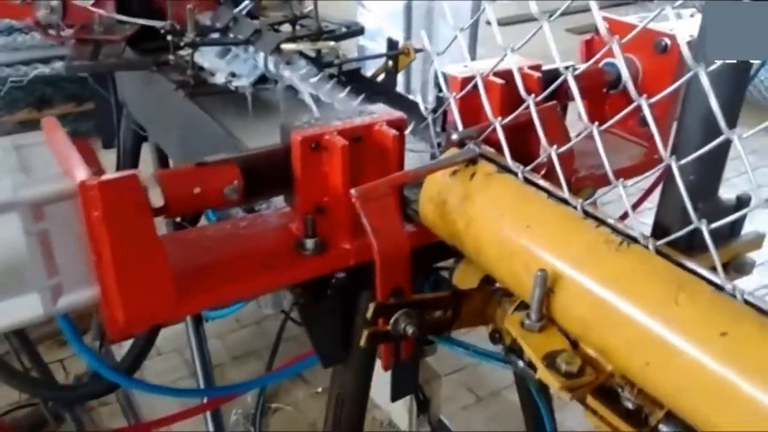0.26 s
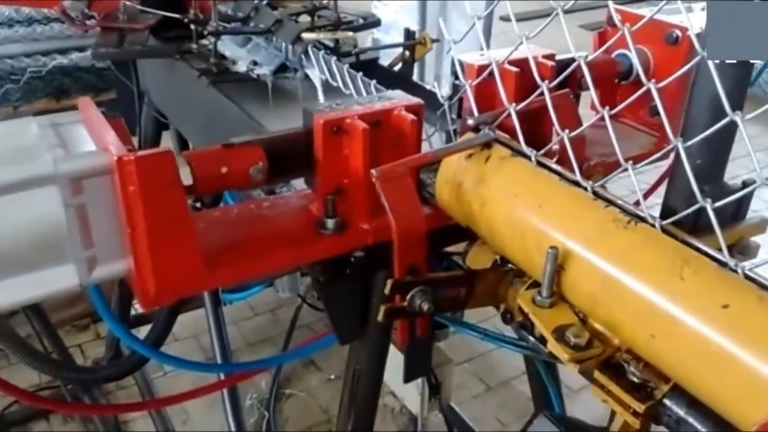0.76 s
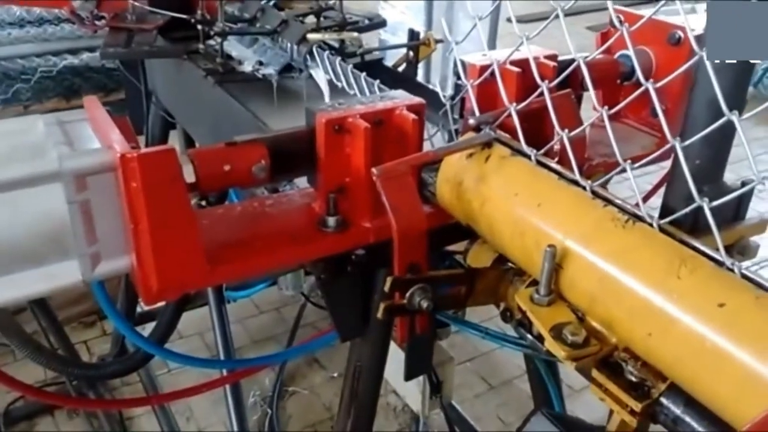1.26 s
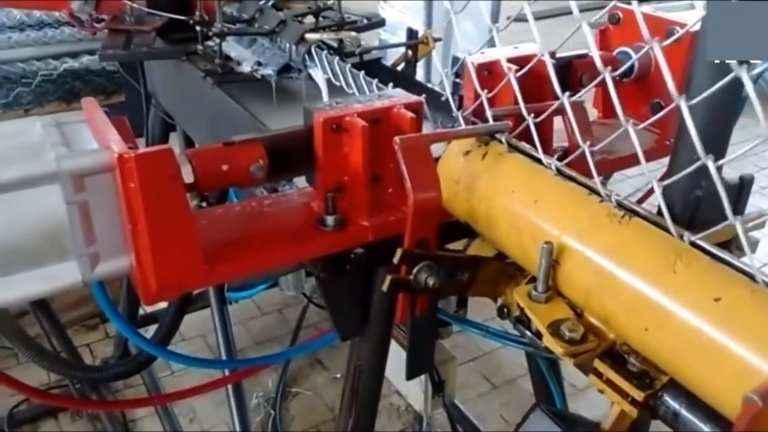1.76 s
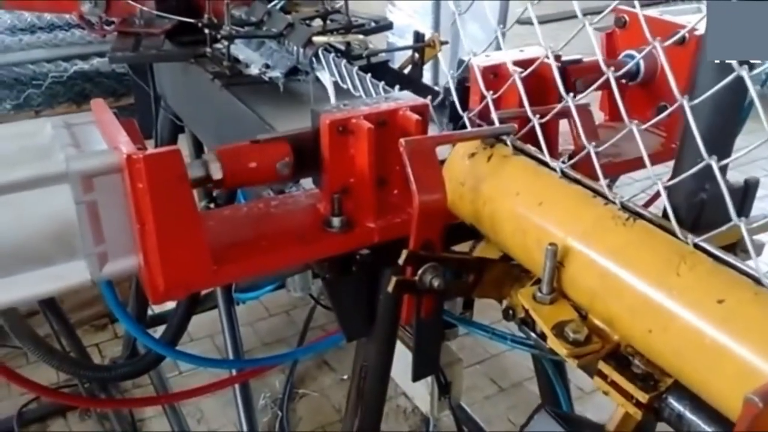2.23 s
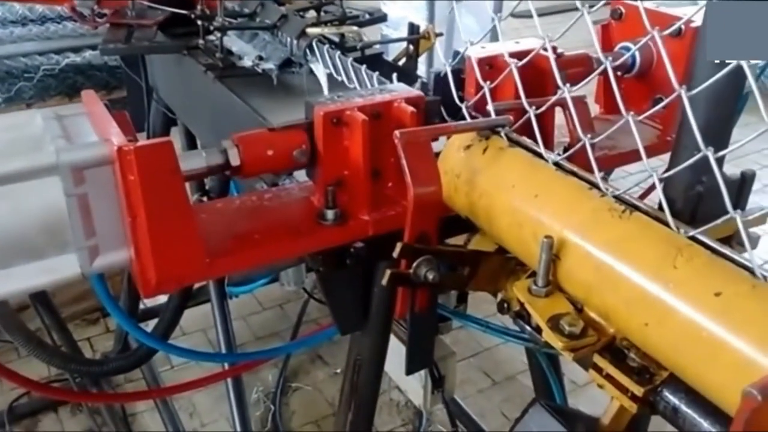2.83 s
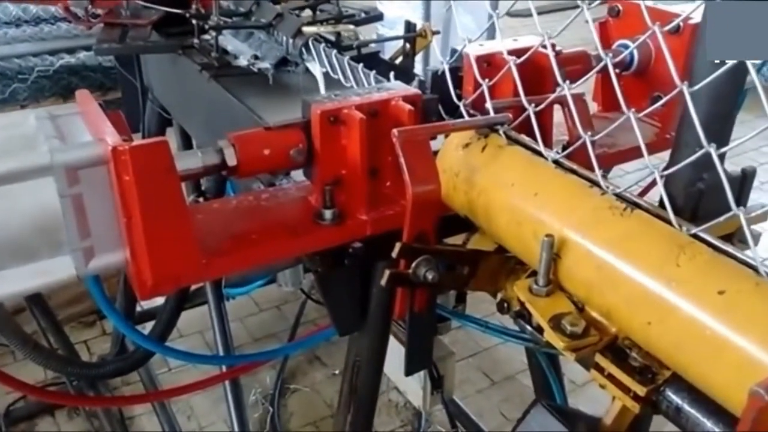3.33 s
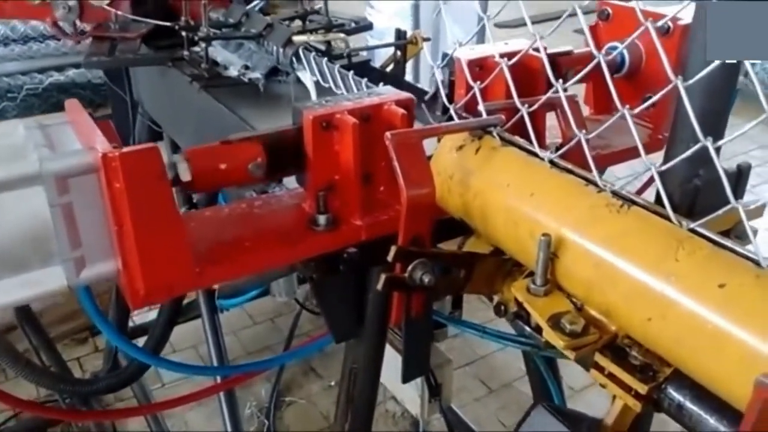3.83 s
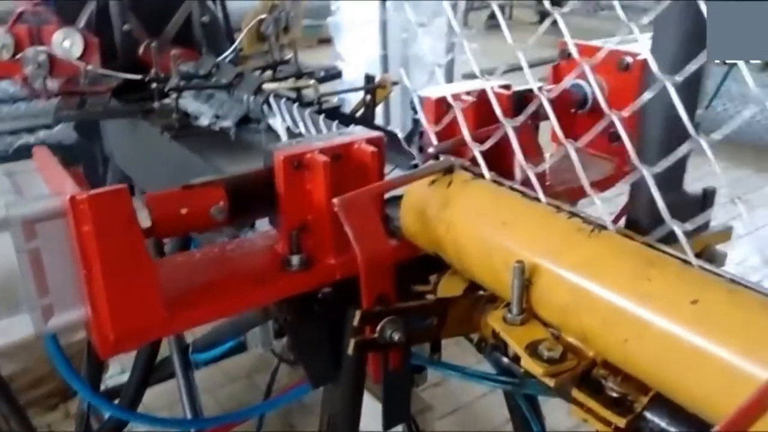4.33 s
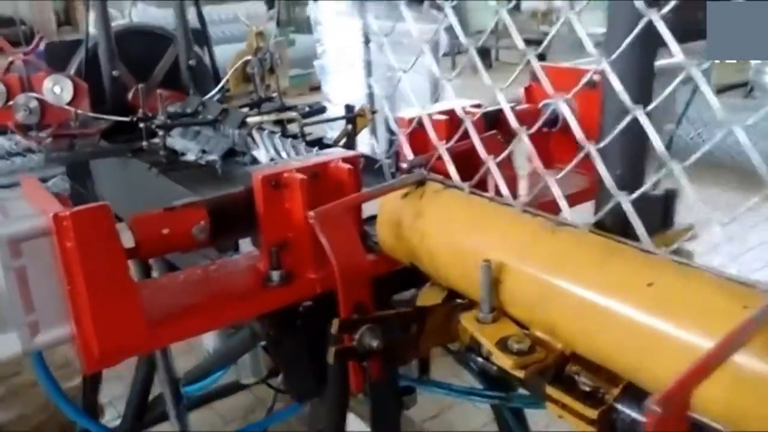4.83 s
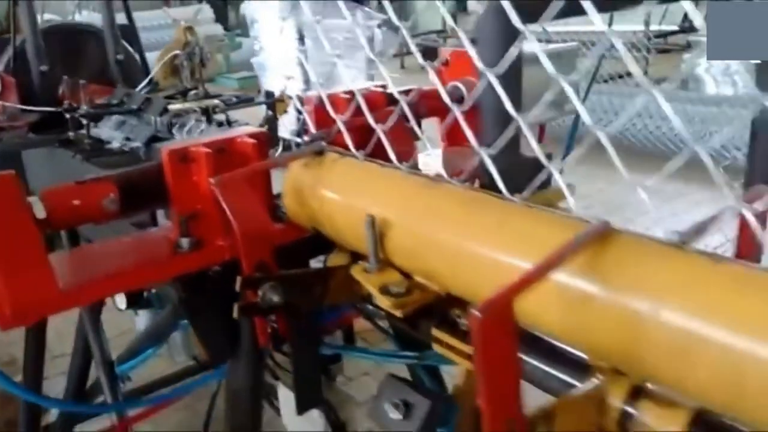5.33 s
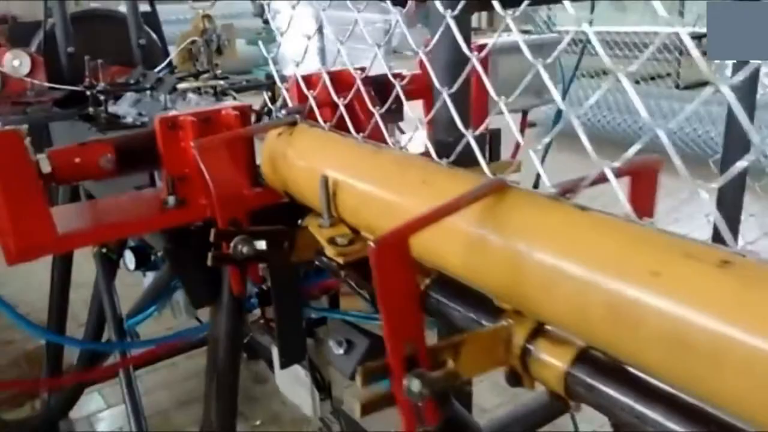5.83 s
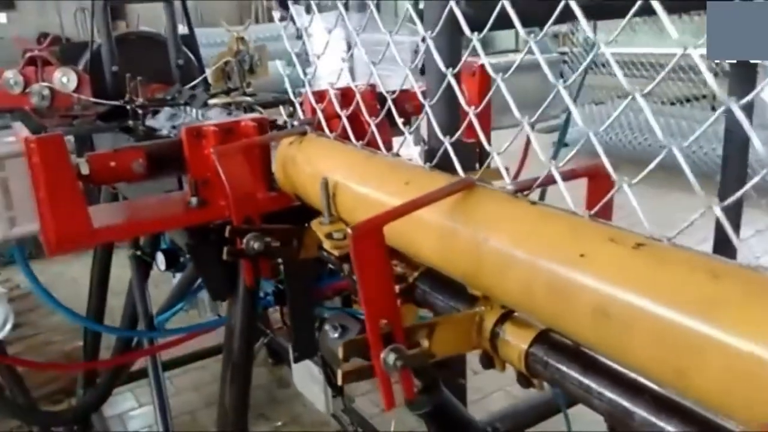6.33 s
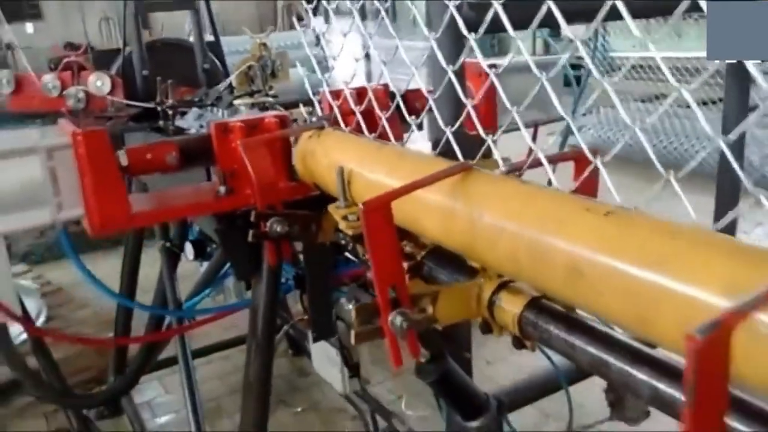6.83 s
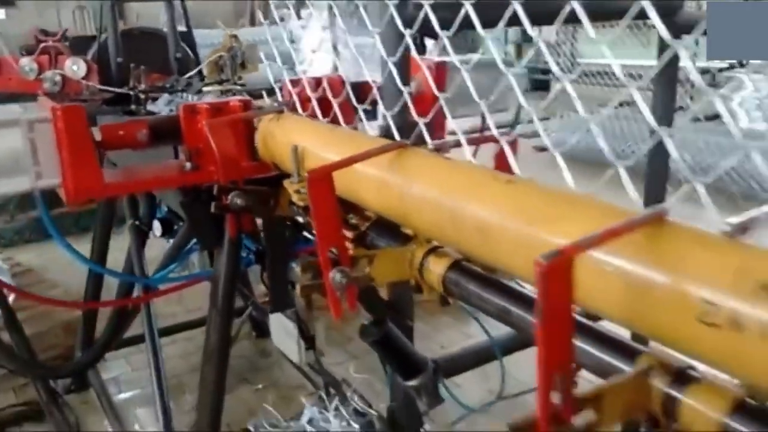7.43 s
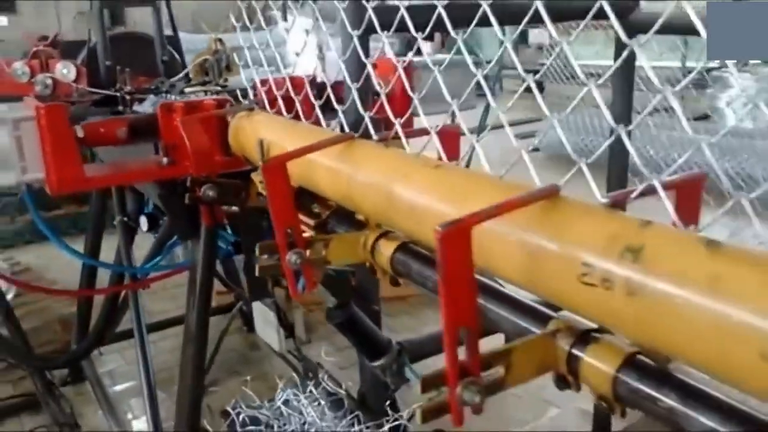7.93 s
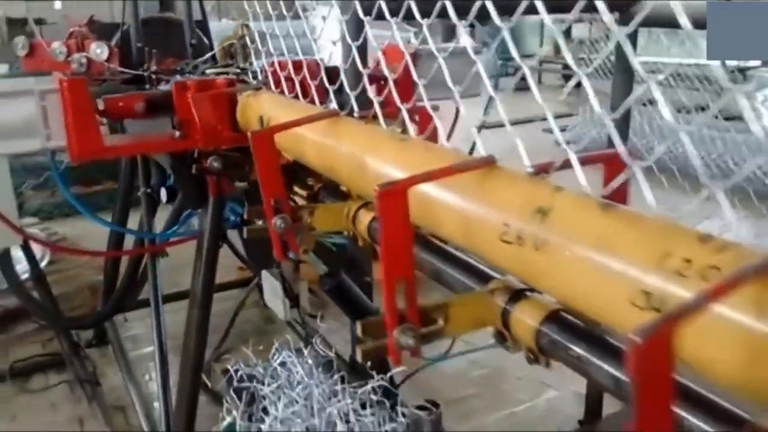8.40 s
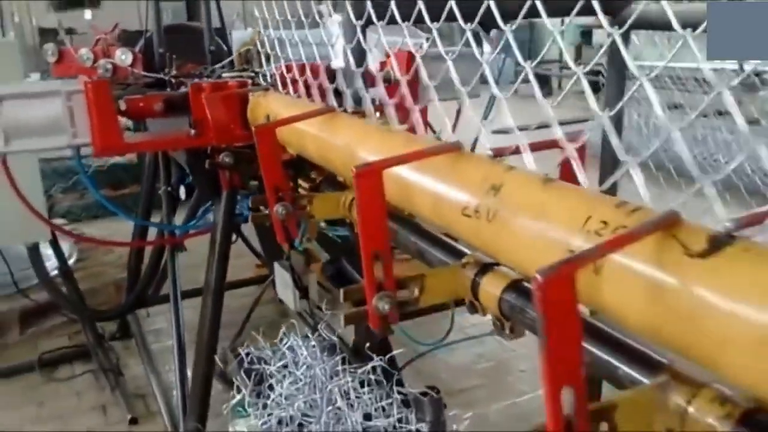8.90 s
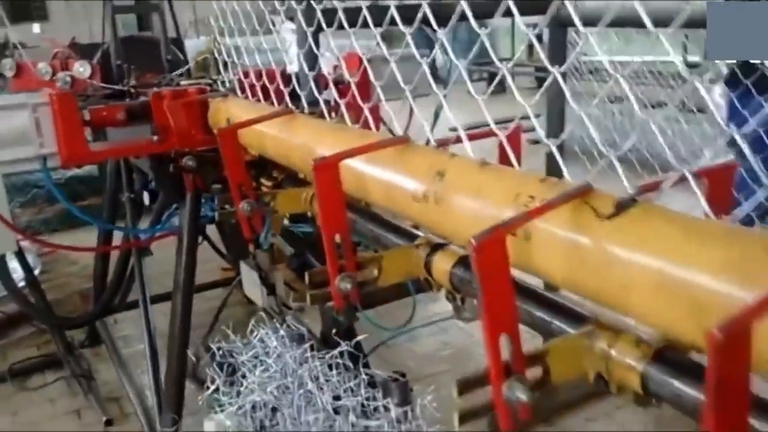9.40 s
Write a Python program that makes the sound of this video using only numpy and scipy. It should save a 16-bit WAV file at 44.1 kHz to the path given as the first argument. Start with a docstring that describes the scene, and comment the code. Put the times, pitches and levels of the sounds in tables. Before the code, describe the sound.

A wire-mesh weaving machine clacks, hisses compressed air and snaps its cutter, then whines up into fast metallic slapping of a whirling wire spiral.

```python
"""A chain-link weaving machine goes through one cycle in a hard-walled workshop, heard from close by.
The last spiral runs out (decaying jingle) as clamps clack (impact noise through modes) and the mesh is drawn on.
A cylinder vents (coloured noise, puffs on the microphone), the cutter snaps, its frame rings, a cylinder vents again.
Rollers feed wire with a whine; the blade spins up and screws a new spiral along its guide tube, where it slaps
about eleven times a second. Motors hum over the murmur of the hall throughout."""
import sys
import numpy as np
from scipy import signal
from scipy.fft import rfft, irfft, next_fast_len
from scipy.io import wavfile

SR = 44100
rng = np.random.default_rng(int(sys.argv[2]) if len(sys.argv) > 2 else 0)


def master(y):
    """Save y as 16-bit WAV."""
    cut = np.clip(np.atleast_2d(y).T, -1, 1)
    pcm = np.round(cut * 32767)  # scale
    wavfile.write(sys.argv[1], SR, pcm.astype(np.int16))


N = 426006
TIME = np.arange(N) / SR
MID_ONLY = np.array([[1], [0]])

# spiral whirling in its guide: (time [s], relative level [dB])
WHIRL = [(4.3, -34), (4.88, -35), (5.6, -26), (6.42, -28.5), (6.88, -33.5), (8.15, -25.5), (8.35, -28.5),
         (9.15, -25), (9.66, -29)]
# mesh drawn on, wire against steel: (time [s], relative level [dB])
PULL = [(1.59, -39), (1.66, -38), (1.69, -29), (2.04, -34.5)]
# loose wire between slaps: (frequency [Hz], relative level [dB])
JINGLE_COLOUR = [(40, -50.5), (150, -27), (450, -7), (1000, -3), (2000, 2.5), (3000, -8), (4200, 6.5),
                 (5500, -2.5), (6500, -3.5), (8400, 1), (10000, -5), (13000, -9.5), (15500, -53.5)]


def undb(db):
    """Decibels to gain."""
    return 10 ** (np.asarray(db) / 20)


def lookup(hz, points):
    """Read a table on a log-frequency axis."""
    f, value = np.transpose(points)
    return np.interp(np.log(np.maximum(hz, 1)), np.log(f), value)


def tint(x, points):
    """Filter by a (frequency [Hz], gain [dB]) table."""
    size = next_fast_len(x.shape[-1] + 4096, True)
    gain = undb(lookup(np.fft.rfftfreq(size, 1 / SR), points))
    return irfft(rfft(x, size) * gain, size)[..., :x.shape[-1]]


def noise(points):
    """Coloured noise of rms 1, unrelated in mid and side."""
    x = tint(rng.standard_normal((2, N)), points)
    return x / x.std()


def unit(x):
    """Scale each response to unit energy."""
    return x / np.sqrt(np.sum(np.abs(x) ** 2, axis=-1, keepdims=True))


def curve(rows, fade_s=0.041):
    """Gain from (time [s], level [dB]) rows, fading out beyond its ends."""
    s, db = np.transpose(rows)
    inside_s = np.minimum(TIME - s[0], s[-1] - TIME)
    return undb(np.interp(TIME, s, db)) * np.clip(1 + inside_s / fade_s, 0, 1)


def held(start_s, end_s, db, release_s, rise_s=0.005):
    """Gain that rises, holds and dies away."""
    rise = 1 - np.exp(-np.maximum(TIME - start_s, 0) / rise_s)
    return undb(db) * rise * np.exp(-np.maximum(TIME - end_s, 0) / release_s)


def bursts(rows, rise_s, shape):
    """Gain of (time [s], level [dB], length [s]) bursts; a higher shape holds longer, ends more abruptly."""
    power = np.zeros(N)
    for s, db, length_s in rows:
        span = slice(int(max(s, 0) * SR), int((s + 4 * length_s) * SR))
        age_s = np.maximum(TIME[span] - s, 0)
        gain = undb(db) * (1 - np.exp(-age_s / rise_s)) * np.exp(-(age_s / length_s) ** shape)
        power[span] += gain ** 2
    return np.sqrt(power)


def walk(knots_per_s):
    """Smooth random wander with a spread near 1."""
    return np.interp(TIME * knots_per_s, np.arange(N // 100), rng.standard_normal(N // 100))


def contacts(rate_per_s, spread_db, t60_s):
    """Tiny steel-on-steel impacts of uneven size, each a decaying crash of noise; rms near 1."""
    size_db = spread_db * np.clip(rng.standard_normal(N), -2, 2)
    energy = (rng.random(N) < rate_per_s / SR) * undb(size_db) ** 2
    decay = np.exp(-2 * np.log(1000) / (t60_s * SR))
    energy = signal.lfilter([1], [1, -decay], energy + 1e-18)
    return np.sqrt(energy / energy.mean()) * rng.standard_normal((2, N))


def body(force, colour, modes, ring_db):
    """A steel part: a broad colour of crowded modes, and a few clear ones that ring on."""
    size = next_fast_len(N + SR // 2, True)
    f = np.fft.rfftfreq(size, 1 / SR)
    response = unit(undb(lookup(f, colour))) + 0j
    for hz, width_hz, db in modes:
        response += undb(db + ring_db) * unit(1 / (1 + 2j * (f - hz) / width_hz))
    return irfft(rfft(force, size) * unit(response) * np.sqrt(len(f)), size)[:, :N]


def pings(rows, colour, count):
    """Each strike (time [s], level [dB], t60 [s]) lands at a new place and rings other partials."""
    out = np.zeros((2, N))
    for s, db, t60_s in rows:
        start = int(s * SR)
        t = TIME[:min(int(.7 * t60_s * SR), N - start)]
        fade = (1 - np.exp(-t / 0.0052)) * np.exp(-np.log(1000) * t / t60_s)
        hz = 900 * 11 ** (rng.random(count) ** .7)
        weight = unit(rng.choice([-1, 1], (2, count)) * undb(lookup(hz, colour)))
        partials = weight @ np.sin(2 * np.pi * np.outer(hz, t))
        out[:, start:start + len(t)] += undb(db) * fade * partials
    return out


def rings(rows):
    """Struck single modes: (time [s], frequency [Hz], level [dB], t60 [s])."""
    out = np.zeros(N)
    for s, hz, db, t60_s in rows:
        span = slice(int(s * SR), int((s + t60_s) * SR))
        t = TIME[span] - TIME[span][0]
        fade = (1 - np.exp(-t / 0.0042)) * np.exp(-np.log(1000) * t / t60_s)
        out[span] += undb(db) * fade * np.sin(2 * np.pi * hz * t)
    return out * MID_ONLY


def recolour(x, starts_s, spread_db):
    """From each start on, the sound has its own random peaks and valleys."""
    pad = 512  # room for the zero-phase filter to ring ahead
    out = np.zeros((2, N + 4096))
    edges = [0] + [int(s * SR) for s in sorted(starts_s)] + [N]
    hz = np.geomspace(700, 15000, 100)
    for a, b in zip(edges, edges[1:]):
        size = next_fast_len(b - a + 2 * pad, True)
        gain = undb(spread_db * np.clip(rng.standard_normal(len(hz)), -2, 2))
        gain = gain / np.sqrt(np.mean(gain ** 2))
        gain = np.interp(np.fft.rfftfreq(size, 1 / SR), hz, gain)
        padded = np.pad(x[:, a:b], ((0, 0), (pad, 0)))
        piece = irfft(rfft(padded, size) * gain, size)
        out[:, a:b + 2 * pad] += piece[:, :b - a + 2 * pad]
    return out[:, pad:N + pad]


def shifting(x, spread_db):
    """A sliding contact or a turbulent jet changes its peaks and valleys at uneven moments."""
    shifts_per_s = 22
    return recolour(x, rng.uniform(0, N / SR, int(shifts_per_s * N / SR)), spread_db)


def whine(rows, octave_db, waver, flutter_db):
    """A wavering tone and its octave follow (time [s], pitch [Hz], level [dB]) rows."""
    s, hz, db = np.transpose(rows)
    pitch_hz = np.interp(TIME, s, hz) * (1 + waver * walk(60))
    phase = 2 * np.pi * np.cumsum(pitch_hz) / SR
    tone = np.sin(phase) + undb(octave_db) * np.sin(2 * phase)
    return tone * curve(np.transpose([s, db])) * undb(flutter_db * walk(14)) * MID_ONLY


def coast():
    """Gain of the whirl left from the cycle before, dying away."""
    # last spiral: (relative level [dB], release [s])
    last_whirl = (-25, 0.37)
    db, release_s = last_whirl
    return undb(db) * np.exp(-TIME / release_s)


def stray_clinks(motion):
    """Loose turns of wire touch at random moments, as strongly as the wire is lively."""
    clinks_per_s, clink_db, t60_s = 35, -7, .09
    starts = rng.integers(0, N - 1, int(clinks_per_s * N / SR))
    rows = [(i / SR, 20 * np.log10(motion[i] + 1e-9) + clink_db, t60_s) for i in starts]
    return pings(rows, JINGLE_COLOUR, count=4)


def spiral():
    """The whirling wire chatters against the guide once a turn, sometimes drags, and jingles in between."""
    # slaps on the guide: (time [s], relative level [dB], chatter length [s])
    slaps = [(4.3494, -23.5, 0.048), (4.4578, -21.5, 0.063), (4.5702, -20.5, 0.042), (5.4196, -23, 0.0194),
             (5.516, -21, 0.024), (5.7961, -10.5, 0.014), (5.9248, -13.5, 0.014), (5.9968, -12.5, 0.0158),
             (6.097, -16, 0.03), (6.1774, -16.5, 0.045), (6.2701, -10.5, 0.028), (6.3637, -12, 0.016),
             (6.474, -12.5, 0.018), (6.5383, -12, 0.024), (6.6205, -8, 0.015), (6.7265, -9.5, 0.026),
             (6.812, -10.5, 0.023), (6.9136, -19, 0.022), (6.984, -8, 0.0279), (7.0747, -9, 0.034),
             (7.1684, -12, 0.03), (7.2644, -11.5, 0.023), (7.349, -15.5, 0.044), (7.4486, -9.5, 0.0267),
             (7.5234, -15, 0.059), (7.6312, -13.5, 0.017), (7.7139, -12.5, 0.028), (7.7968, -9, 0.026),
             (7.891, -11.5, 0.042), (7.9747, -10.5, 0.072), (8.0643, -10.5, 0.031), (8.172, -10.5, 0.015),
             (8.2554, -7.5, 0.017), (8.3456, -7.5, 0.029), (8.436, -8, 0.025), (8.528, -9, 0.022),
             (8.609, -9.5, 0.024), (8.6948, -8, 0.052), (8.7918, -7, 0.034), (8.8791, -6.5, 0.046),
             (8.971, -3.5, 0.036), (9.0597, -8, 0.038), (9.1515, -4, 0.035), (9.2412, -9.5, 0.049),
             (9.3311, -7.5, 0.05), (9.4281, -8, 0.02), (9.512, -13, 0.036), (9.609, -10, 0.027)]
    # drags along the guide; negative lengths are silent: (time [s], relative level [dB], length [s])
    drags = [(7.542, -20.5, .028), (8.07, -25, -0.05), (8.1, -19, 0.02), (8.155, -21.5, -0.22),
             (9.255, -27, 0.14)]
    # wire: (frequency [Hz], relative level [dB])
    wire_colour = [(40, -50.5), (150, -27), (450, -13.5), (1000, 0), (2000, 3.5), (3000, -7.5), (4200, 5),
                   (5500, -1), (6500, -3.5), (8400, 2.5), (10000, -7), (13000, -4.5), (15500, -56)]
    # clear modes of struck and of dragged wire: (frequency [Hz], width [Hz], relative energy [dB])
    wire_modes = [(583, 33, -15), (997, 22, -24), (1614, 15, -37), (2013, 8.9, -15.5), (4090, 150, -18),
                  (4466, 21, -22), (5140, 50, -20), (5630, 70, -15.5), (7690, 120, -14.5),
                  (8020, 90, -15.5), (8395, 43, -11.5), (8756, 17, -20)]
    drag_modes = [(4140, 120, -12), (4500, 40, -6)]
    rebound_s, rebound_db = .014, -1  # mean delay; level against the slap

    chatter = bursts(slaps, rise_s=0.00039, shape=1.45) * contacts(rate_per_s=2000, spread_db=0.5, t60_s=0.012)
    struck = body(undb(-9.5) * chatter, wire_colour, wire_modes, ring_db=2.5)
    struck = recolour(struck, [s - .004 for s, _, _ in slaps], spread_db=4.5)

    clinks = [(s, db, .1) for s, db, _ in slaps]
    for s, db, _ in slaps:
        clinks.append((s + rebound_s * (.5 + rng.random()), db + rebound_db, .06))
    ring = undb(-6.5) * pings(clinks, wire_colour, count=18)

    scrape = bursts(drags, rise_s=.003, shape=2) * rng.standard_normal((2, N))
    drag = body(scrape, wire_colour, drag_modes, ring_db=-5)

    loose = undb(0.67) * curve(WHIRL) + undb(-0.5) * curve(PULL) + coast()
    touches = undb(2.0 * walk(35)) * contacts(rate_per_s=980, spread_db=1.0, t60_s=0.031)
    jingle = body(undb(-5.5) * loose * touches, JINGLE_COLOUR, wire_modes, ring_db=-4.0)
    return struck + ring + drag + shifting(jingle, spread_db=3.5) + stray_clinks(loose)


def clamps():
    """Clamps and benders strike and set the mesh and single parts ringing."""
    # strikes: (time [s], relative level [dB], chatter length [s])
    clacks = [(.215, -18, 0.024), (0.235, -14, 0.0136), (.315, -13, 0.016), (.378, -18.5, 0.012),
              (.402, -17.5, 0.1), (0.497, -19.5, 0.029), (.56, -19.5, 0.022), (.665, -31, 0.0144),
              (1.25, -41, 0.079), (1.66, -36, 0.0203), (1.678, -26, 0.015), (1.722, -29, 0.055)]
    # clamps: (frequency [Hz], relative level [dB])
    clamp_colour = [(30, -36.5), (120, -18), (500, -3), (1100, -3.5), (1900, 2.5), (3000, -11), (4200, 5),
                    (5300, 3), (6500, -6), (8300, 5.5), (11000, -6), (15500, -11.5)]
    # clamps: (frequency [Hz], width [Hz], relative energy [dB])
    clamp_modes = [(1660, 44, -22), (2245, 120, -12.5), (4060, 120, -12), (4950, 190, -14)]
    # mesh ringing on: (time [s], level [dB], t60 [s])
    mesh_rings = [(.47, -24.5, 0.735), (1.25, -42, 0.22), (1.685, -23.5, 0.22)]
    # mesh: (frequency [Hz], relative level [dB])
    mesh_colour = [(900, -37), (2200, -4), (3000, -13), (4200, -3), (5050, 4), (6500, -16), (10000, -23.5)]
    # single parts singing on: (time [s], frequency [Hz], level [dB], t60 [s])
    part_rings = [(.48, 223.1, -36, 0.6), (.48, 432, -43, 0.85), (1.241, 3987, -38, 0.22),
                  (1.585, 589, -33, 0.35)]
    force = bursts(clacks, rise_s=0.00078, shape=2.26) * contacts(rate_per_s=1400, spread_db=2.5, t60_s=0.023)
    struck = undb(0.07) * body(force, clamp_colour, clamp_modes, ring_db=-6.5)
    struck = recolour(struck, [s for s, _, _ in clacks], spread_db=3)
    return struck + pings(mesh_rings, mesh_colour, count=110) + rings(part_rings)


def cutter():
    """The blade snaps shut and rebounds; the blow goes through the frame, which rings on."""
    # snap and rebound: (time [s], relative level [dB], chatter length [s])
    cuts = [(2.832, -9.5, 0.022), (2.845, -11, 0.035)]
    # cutter: (frequency [Hz], relative level [dB])
    cutter_colour = [(30, -34), (110, 0.5), (300, -1), (700, 1), (1300, 8), (2000, 2.5), (3000, -9.5),
                     (4300, 2.5), (6400, -10), (8200, -2), (11000, -14), (15500, -21)]
    # cutter: (frequency [Hz], width [Hz], relative energy [dB])
    cutter_modes = [(837, 11, -16), (1879, 15.3, -8)]
    # frame ringing on: (time [s], level [dB], t60 [s])
    frame_ring = [(2.836, -31, 1.9)]
    # frame: (frequency [Hz], relative level [dB])
    frame_colour = [(950, -5), (1250, 4.5), (1550, -7.5), (2100, -22), (3000, -34.5)]
    # clear modes of the frame: (frequency [Hz], level [dB], t60 [s])
    frame_modes = [(258, -34.5, 1.17), (1024, -38, 1.74), (1191, -37.5, 1.2), (1196, -34, 1.52),
                   (1210, -40, 1.23), (1373, -37, 1.0), (1445, -29, 0.94), (1545, -36, 0.5)]
    force = bursts(cuts, rise_s=0.0016, shape=0.91) * contacts(rate_per_s=2100, spread_db=2.5, t60_s=0.02)
    frame = pings(frame_ring, frame_colour, count=60) + rings([(cuts[0][0], *mode) for mode in frame_modes])
    return undb(2.5) * body(force, cutter_colour, cutter_modes, ring_db=-11.0) + frame


def wire_ping():
    """The cut end of the wire springs free and rings."""
    # ping: (time [s], frequency [Hz], level [dB], t60 [s])
    free_end = [(2.884, 7980, -15, .05)]
    return rings(free_end)


def air():
    """Valves tick and open abruptly; the cylinders vent, then hiss empty."""
    # strokes: (time [s], relative level [dB], rise [s], stroke [s], sag [dB/s])
    vents = [(2.048, -18, 0.03, 0.37, -24.5), (3.486, -22, 0.0046, 0.4, -17.5)]
    # valves and latches: (time [s], level [dB], length [s])
    tick_rows = [(1.546, -35, .01), (1.657, -36, .012), (3.473, -35, .02)]
    # jet, bleed and tick: (frequency [Hz], relative level [dB])
    jet_colour = [(400, -52.5), (1000, -8.5), (2000, 2), (3000, -14.5), (3900, 3.5), (5400, 1.5),
                  (6400, -5), (8200, 7.5), (10000, -2), (12500, -1.5), (15500, -9.5)]
    bleed_colour = [(1000, -22), (3000, -24), (4300, 6), (6400, -6.5), (8200, 2), (10000, -1), (15500, -2)]
    tick_colour = [(2000, -25), (4500, -3), (6500, -11), (8200, 10), (10000, -11), (15000, -9)]
    valve_close_s, bleed_db, bleed_s = 0.041, -36.5, 0.784
    blast = bleed = 0
    for s, db, rise_s, stroke_s, sag_db_per_s in vents:
        sag = undb(sag_db_per_s * np.maximum(TIME - s, 0))
        blast = blast + held(s, s + stroke_s, db, valve_close_s, rise_s) * sag
        bleed = bleed + held(s, s + bleed_s, bleed_db, valve_close_s)
    flutter = undb(1.1 * walk(37))
    ticks = bursts(tick_rows, rise_s=0.0011, shape=1.5) * noise(tick_colour)
    jet = undb(-1.5) * blast * noise(jet_colour) + bleed * noise(bleed_colour)
    return flutter * shifting(jet, spread_db=2.5) + ticks


def buffets():
    """Eddies flutter on the microphone ports, the bass mostly opposed in left and right."""
    # air as the cylinders fire: (time [s], relative level [dB], length [s])
    cylinder_puffs = [(.222, -23, 0.036), (.316, -18.5, 0.025), (.4, -16.5, 0.072), (.415, -17.5, 0.1),
                      (2.058, -20.5, 0.13), (2.834, -18.5, 0.0525), (3.49, -20.5, 0.092)]
    # air fanned by the spiral on some turns: (time [s], relative level [dB])
    fanning = [(7.082, -32), (7.171, -33), (7.268, -38), (8.438, -36), (8.61, -35), (8.703, -28),
               (8.796, -24.5), (8.883, -25.5), (8.974, -19), (9.065, -31), (9.156, -18), (9.245, -27),
               (9.334, -18.5)]
    # puffs in mid and in side: (frequency [Hz], relative level [dB])
    mid_colour = [(25, -29), (80, 5), (200, 6), (600, 6), (1200, 6), (2200, 2.5), (4000, -9.5)]
    side_colour = [(25, -13), (60, -9), (120, 6.5), (250, -3), (450, -6.5), (800, -11.5), (1400, -26),
                   (3000, -23.5)]
    fan_puff_s = 0.02204
    fanned = [(s, db, fan_puff_s) for s, db in fanning]
    gust = bursts(cylinder_puffs + fanned, rise_s=0.00084, shape=5.0) * undb(0.22 * walk(150))
    return gust * np.array([undb(-0.5) * noise(mid_colour)[0], undb(4.0) * noise(side_colour)[1]])


def rubbing():
    """Wire sticks and slips over steel; each stage of the cycle rings different parts."""
    # wire feed and grinding: (time [s], relative level [dB])
    feed_rows = [(3.65, -64.5), (3.948, -47.5), (3.968, -47), (4.854, -40), (5.376, -34.5), (5.5, -52)]
    grind_rows = [(5.45, -31), (5.806, -23.5), (6.008, -32.5), (6.172, -25.5), (6.6, -31), (6.68, -65)]
    # wire creeping forward: (start [s], end [s], level [dB], release [s], rise [s])
    creep = (2.5, 3.5, -41, 0.2, 0.02)
    # blade at full speed: (start [s], end [s], relative level [dB], release [s])
    full_speed = (6.5, 9.7, 0.42, 1)
    # rubbed steel: (frequency [Hz], relative level [dB])
    rub_colour = [(30, -60), (150, -9), (400, -10), (600, 1.5), (1300, -5), (2200, -3.5), (3000, -14),
                  (6000, -23.5)]
    # parts rung in each stage: (frequency [Hz], width [Hz], relative energy [dB])
    pull_modes = [(650, 14.6, -10), (590, 63, -7)]
    feed_modes = [(602, 130, -16.5), (707, 31.4, -0.5), (765, 50, -5.5), (1443, 68, 1), (2000, 480, 1.5)]
    grind_modes = [(404, 5.8, -16), (452, 16, -2.5), (570, 65, -18), (748, 11, -5.5), (818, 5.5, -17),
                   (1032, 42, 1.5), (774, 43, -10), (1320, 72, -4)]
    spin_modes = [(461.5, 6.2, -13), (580, 26.3, -11.5), (748.5, 6.6, -6)]

    pull = undb(-1.5) * curve(PULL)
    feed = undb(5.5) * curve(feed_rows) + held(*creep)
    grind = undb(-0.35) * curve(grind_rows)
    spin = undb(-8.5) * curve(WHIRL) * held(*full_speed) + undb(-9.0) * coast()
    stages = [(pull, pull_modes), (feed, feed_modes), (grind, grind_modes), (spin, spin_modes)]
    slips = undb(2 * walk(45)) * contacts(rate_per_s=1000, spread_db=1.0, t60_s=0.024)
    rubbed = sum(body(pressure * slips, rub_colour, modes, ring_db=-5.5) for pressure, modes in stages)
    return shifting(rubbed, spread_db=2)


def feed_whine():
    """The feed rollers whine: a tone and a weak octave."""
    # rollers: (time [s], pitch [Hz], level [dB])
    roller_rows = [(3.93, 705, -50), (4.15, 710, -44), (4.4, 702, -49), (4.8, 699, -48),
                   (5.03, 684.3, -36.5), (5.42, 708, -35.5), (5.52, 721, -55)]
    return whine(roller_rows, octave_db=-12, waver=0.008, flutter_db=2)


def guide_song():
    """The wire sings in its guide as it starts to turn, rising in pitch."""
    # wire: (time [s], pitch [Hz], level [dB])
    song_rows = [(4.34, 536, -41), (4.55, 582, -43), (4.75, 613, -56)]
    return whine(song_rows, octave_db=-16.5, waver=0.04, flutter_db=3.0)


def drive_whine():
    """The drive whines higher as it gathers speed: a tone and a strong octave."""
    # drive: (time [s], pitch [Hz], level [dB])
    speed_rows = [(6.3, 374.4, -47), (6.58, 389.4, -35.5), (6.85, 412.3, -47.5), (7.55, 442, -47),
                  (8.4, 477, -45), (8.9, 478, -57)]
    return whine(speed_rows, octave_db=-1, waver=0.012, flutter_db=2.5)


def drive():
    """Motor and gears rumble through the frame, louder under load."""
    # feeding wire and spinning up: (time [s], relative level [dB])
    load_rows = [(4.1, -57), (4.16, -55.5), (5.72, -31), (6.04, -50), (6.09, -36), (6.56, -44.5)]
    # frame at the drive: (frequency [Hz], relative level [dB])
    drive_colour = [(25, -52), (50, -34), (75, -4), (100, 2), (160, -0.5), (260, 7), (400, 2.5), (900, -44)]
    # frame at the drive: (frequency [Hz], width [Hz], relative energy [dB])
    drive_modes = [(98.6, 4.4, -10), (117.8, 2.44, -6.5), (201.23, 2.4, -4.5)]
    idle = undb(-53.5)
    load = idle + undb(1.5) * curve(load_rows) + undb(-9.5) * curve(PULL)
    force = load * contacts(rate_per_s=610, spread_db=3.0, t60_s=0.038)
    return undb(-5.0) * body(force, drive_colour, drive_modes, ring_db=-6.87)


def hum(lines):
    """Motor lines (frequency [Hz], level [dB]) that waver a little in level and phase."""
    out = 0
    for hz, db in lines:
        out = out + undb(db + 1.5 * walk(3.38)) * np.sin(2 * np.pi * hz * TIME + 0.35 * walk(10))
    return out


def workshop(x):
    """Diffuse echo of the hall as decaying noise, with its own decay time at each frequency."""
    # reverberation: (frequency [Hz], t60 [s])
    room_t60 = [(100, 0.67), (1200, 1.72), (4000, 1.109), (8000, 1.04), (15000, 0.702)]
    f, t, z = signal.stft(rng.standard_normal((2, SR * 3 // 2)), SR)
    decay = np.exp(-np.log(1000) * t / lookup(f, room_t60)[:, None])
    tail = signal.istft(z * decay, SR)[1]
    onset = np.clip(TIME[:tail.shape[-1]] / 0.00395, 0, 1)
    return signal.fftconvolve(x, unit(tail * onset), axes=-1)[:, :N]


def hall():
    """Motors hum, harder while they feed wire, over the murmur of the hall."""
    # murmur: (frequency [Hz], relative level [dB])
    shop_colour = [(25, -62), (70, -24), (110, 1), (200, -3), (400, -2.5), (700, 5.5), (1400, 4),
                   (3000, -12.5), (4200, 2.5), (6400, -14.5), (12000, -16), (15500, -38)]
    # motors throughout: (frequency [Hz], level [dB])
    idle_lines = [(97.2, -62), (118.6, -57.5)]
    # motors under load: (time [s], relative level [dB])
    load_hum = [(3.7, -64), (4.1, -57), (4.5, -53), (5.0, -44.5), (5.7, -42.5), (6.6, -59)]
    # lines under load: (frequency [Hz], relative level [dB])
    load_lines = [(97.2, -2), (119, -2), (195, 0.97)]
    motors = hum(idle_lines) + curve(load_hum) * hum(load_lines)
    return undb(-43.5) * noise(shop_colour) + motors * MID_ONLY


def ports(x):
    """The work lies off to the right, so the straight part of its sound reaches the left port later."""
    straight, lag_samples = .3, 9
    shared, apart = np.sqrt(1 + straight) * x[0], np.sqrt(1 - straight) * x[1]
    left, right = np.roll(shared + apart, lag_samples), shared - apart
    return np.array([left + right, left - right]) / 2


def scene():
    """The machine, its echo and the hall, mixed in mid and side, then turned to left and right."""
    # side channel filter: (frequency [Hz], gain [dB])
    side_gain = [(60, -7.5), (300, -8.5), (700, -8.5), (1400, -14), (1900, -13), (2400, 2.5), (3100, 12.5),
                 (4300, -7), (6400, 5.5), (8200, -3.5), (15000, 2)]
    wire, clack, cut, hiss = spiral(), clamps(), cutter(), air()
    rub = rubbing() + drive() + drive_whine() + feed_whine() + guide_song()
    echo_send = undb(-6.0) * wire + undb(1.0) * clack + undb(-8.0) * cut + undb(-4.5) * hiss + undb(-7.0) * rub
    field = ports(wire + clack + hiss) + cut + wire_ping() + rub + workshop(echo_send) + hall()
    mid, side = np.array([field[0], tint(field[1], side_gain)]) + buffets()
    return np.array([mid + side, mid - side])


def record(dry):
    """Clip at full scale, then cut the top with a steep elliptic low-pass."""
    top_hz = 15700
    low_pass = signal.ellip(10, .2, 70, top_hz, fs=SR, output="sos")
    return signal.sosfilt(low_pass, np.clip(dry, -1, 1))


dry = scene()
out = record(dry)
master(out)
```